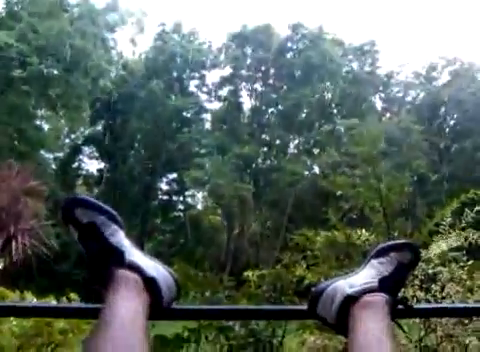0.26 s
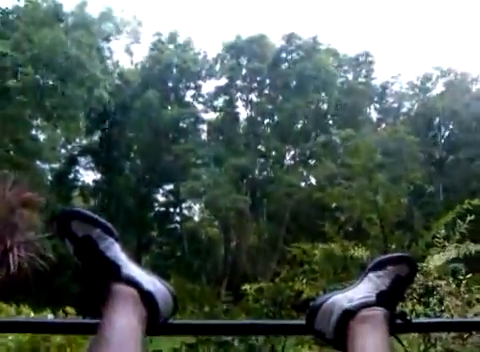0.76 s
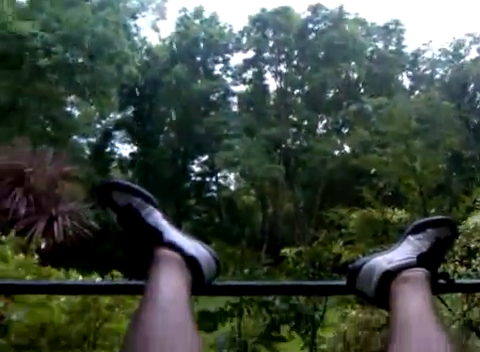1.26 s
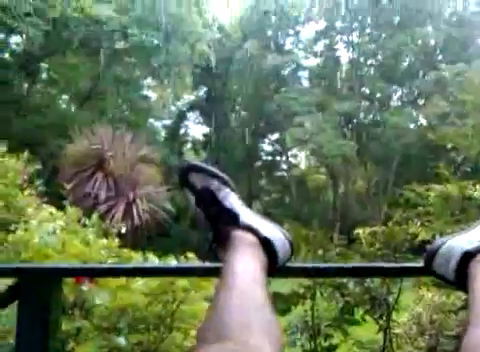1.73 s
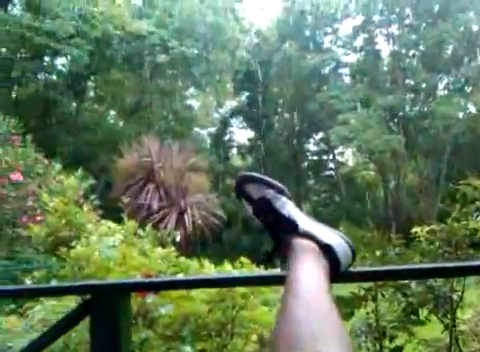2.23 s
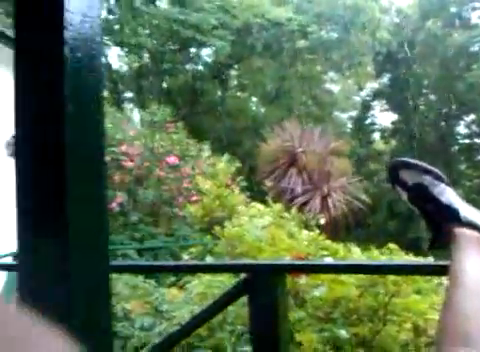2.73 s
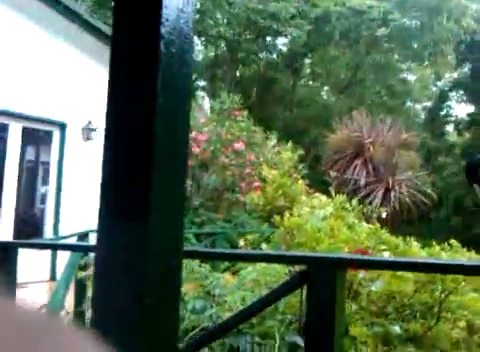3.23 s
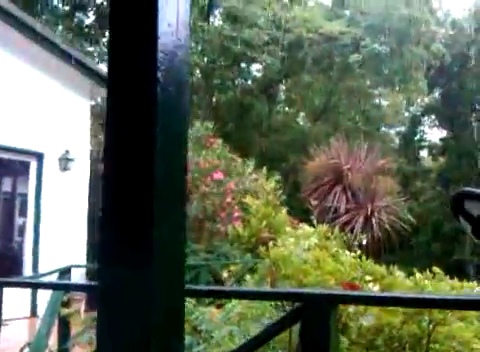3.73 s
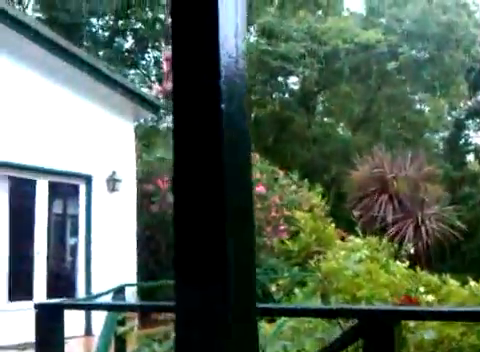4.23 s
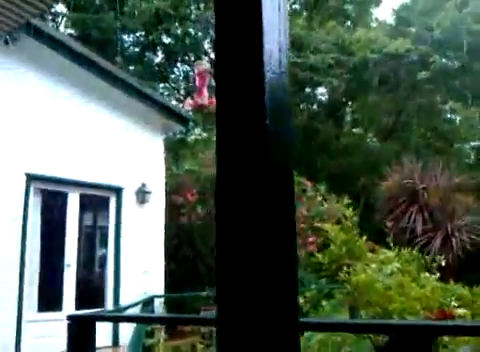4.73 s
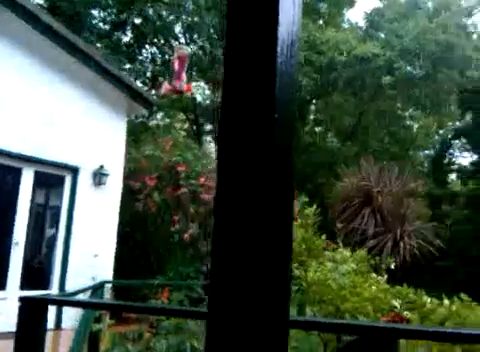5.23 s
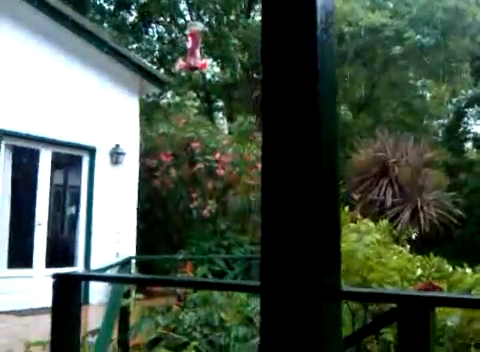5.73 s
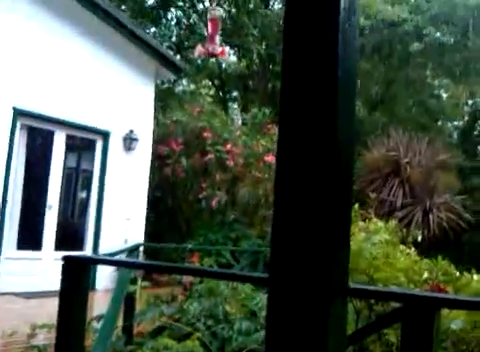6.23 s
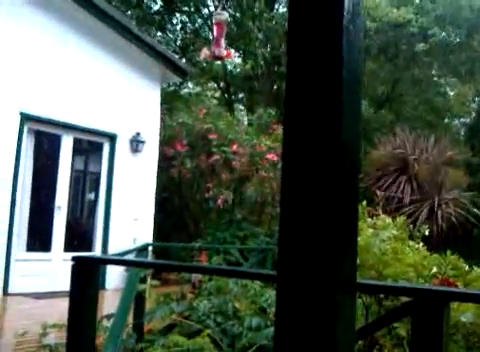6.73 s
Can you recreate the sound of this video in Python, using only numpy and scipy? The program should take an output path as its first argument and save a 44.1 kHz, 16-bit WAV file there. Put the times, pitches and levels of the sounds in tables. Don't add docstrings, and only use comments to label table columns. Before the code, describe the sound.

Steady rain falls on a leafy garden, heard from under a covered porch through a small handheld mono microphone. Distant drops blur into an even, soft wash over a low hum and faint rumble. Close up, crisp drops tick irregularly on leaves, rail and boards, with short scattered reflections. Nearby spatter is fuller in the first half, then thins, leaving isolated sharp taps.

```python
import sys
import numpy as np
from scipy import signal
from scipy.io import wavfile
from scipy.ndimage import uniform_filter1d

SR = 44100
rng = np.random.default_rng(int(sys.argv[2]) if len(sys.argv) > 2 else 0)


def boost(x):
    u = np.asarray(x, float) / 20
    return 10 ** u


def bounce(signal):
    frames = np.transpose(np.atleast_2d(signal))
    limited = np.clip(frames, -1, 1)
    pcm = np.round(limited * 32767).astype(np.int16)
    wavfile.write(sys.argv[1], SR, pcm)


N = 307818

# (time [s], strength [dB])
RAIN_STRENGTH = [(0.0, -46), (0.1, -54.5), (1.05, -50), (1.98, -45.5), (2.49, -44.5), (2.84, -46),
                 (3.24, -42.5), (3.81, -48), (4.0, -52), (4.31, -49.5), (4.72, -68), (5.38, -59),
                 (5.83, -66.5), (6.51, -49), (6.98, -58)]


def evened(x):
    return x / np.sqrt(np.mean(x ** 2) + 1e-20)


def read(points, hz):
    f, value = np.transpose(points)
    return np.interp(np.log(hz + 1), np.log(f + 1), value)


def curve(table, column):
    rows = np.array(table)
    return np.interp(np.arange(N) / SR, rows[:, 0], rows[:, column])


def add(mix, s, sound):
    part = mix[max(round(s * SR), 0):][:len(sound)]
    part += sound[:len(part)]


def low_pass(x, hz, size):
    return signal.oaconvolve(x, signal.firwin(size, hz, window=("kaiser", 11), fs=SR), "same")


def hiss(spectrum, size, patchy_db, flicker_db):
    frames, hz = 4 * N // size + 5, np.fft.rfftfreq(size, 1 / SR)
    real, imag, patches = rng.standard_normal((frames, len(hz), 3)).T
    patches = uniform_filter1d(patches, size=9, axis=0)
    patches = evened(uniform_filter1d(patches, size=9, axis=1))
    flicker = evened(uniform_filter1d(rng.standard_normal(frames), size=3))
    level_db = read(spectrum, hz)[:, None] + patchy_db * patches + flicker_db * flicker
    z = (real + 1j * imag) * boost(level_db)
    return evened(signal.istft(z, nperseg=size, noverlap=3 * size // 4)[1][:N])


def swell(top_hz):
    t = np.arange(0, N + 256, 256) / SR
    rates = np.geomspace(2.5, top_hz, num=20)
    wave = sum(np.sin(2 * np.pi * (f * t + rng.random())) / np.sqrt(f) for f in rates)
    return np.interp(np.arange(N) / SR, t, evened(wave))


def thumps():
    # (time [s], rise of the rumble [dB])
    nudges = [
        (.99, 7),
        (2.78, 6),
        (6.36, 4),
    ]
    width_s = .035
    t = np.arange(N) / SR
    return sum(db * np.exp(-((t - s) / width_s) ** 2) for s, db in nudges)


def rumble():
    # (frequency [Hz], density [dB per Hz])
    low_spectrum = [(7.1, -29.5), (12, -0.5), (110, -8.5), (140, -43), (240, -120)]
    level_db = -64 + thumps() + 0.7 * swell(top_hz=11.0)
    return boost(level_db) * hiss(low_spectrum, size=4096, patchy_db=2.5, flicker_db=1.3)


def porch_hum():
    # (frequency [Hz], width [Hz], level [dB])
    resonances = [
        (150, 45, 1),
        (246.7, 46, 2),
        (420, 93, -5.5),
        (660, 200, -2.5),
    ]
    hz = np.geomspace(60, 2000, num=300)
    power = sum(boost(2 * db) / (1 + (2 * (hz - f) / width) ** 2) ** 2 for f, width, db in resonances)
    spectrum = np.transpose([hz, 10 * np.log10(power)])
    level_db = -64.5 + 0.4 * swell(top_hz=11.)
    return boost(level_db) * hiss(spectrum, size=8192, patchy_db=-1.5, flicker_db=-2.5)


def far_wash(rain_db):
    # (frequency [Hz], density [dB per Hz])
    wash_spectrum = [(59, -37.5), (100, -2.5), (146, -2), (190, -2.5), (240, -2), (376, -1.5), (678, 1),
                     (769, 0), (1660, -1.5), (2020, -3), (6350, -8), (6820, -6), (7200, -14.5),
                     (9360, -43.5), (15800, -120)]
    usual_rain_db = -50
    level_db = -51.5 + 0.04 * (rain_db - usual_rain_db)
    return boost(level_db) * hiss(wash_spectrum, size=1024, patchy_db=0.66, flicker_db=0.93)


def leaf_spatter(rain_db):
    # (frequency [Hz], density [dB per Hz])
    spatter_spectrum = [
        (2000, -33.5),
        (3200, -5),
        (4500, -3.5),
        (6000, 0.5),
        (7300, -4),
    ]
    return boost(rain_db - 6) * hiss(spatter_spectrum, size=256, patchy_db=1., flicker_db=.7)


def ticks(hz, cycles, flutter):
    turns = (np.arange(128) / SR - .001) * hz
    width = np.maximum(cycles, .8) * np.where(turns < 0, .35, .7)
    tick = -np.cos(2 * np.pi * turns) * np.exp(-(turns / width) ** 2)
    tick = signal.fftconvolve(tick - tick.mean(1, keepdims=True), flutter, axes=1)
    return tick / abs(tick).max(1, keepdims=True)


def drops(rows, onset=0.0018, build=0.002, t60=0.16, grain=0.6, ringing=0.77,
          flutter_db=-20.0, flutter_s=0.00078):
    # (delay [s], level [dB])
    echoes = [
        (.0015, -7),
        (.0057, -9),
        (.0105, -12),
        (.0128, -11),
    ]
    tail_cycles = 1.46
    s, tick_db, tick_hz, cycles, tail_db, tail_hz = np.transpose(rows)[:, :, None]
    count = len(s)

    late = np.maximum(np.arange(4800) / SR - onset, 0)
    scatter, lumps = rng.standard_normal((count, len(late), 2)).transpose(2, 0, 1)
    scatter = scatter * np.exp(grain * lumps)
    scatter = scatter * (1 - np.exp(-late / build)) * boost(-60 * late / t60)

    flutter = boost(flutter_db) * rng.standard_normal((count, 128)) * np.exp(-np.arange(128) / SR / flutter_s)
    flutter[:, 0] = 1
    tail_ticks = ticks(tail_hz, ringing * np.maximum(cycles, tail_cycles), flutter)
    tail = signal.fftconvolve(scatter, tail_ticks, axes=1)
    tail *= boost(tail_db) / np.sqrt(np.mean(tail[:, 170:940] ** 2, axis=1, keepdims=True))

    paths, chance = np.zeros(scatter.shape), rng.uniform(-1, 1, (count, len(echoes), 2))
    paths[:, 0] = 1
    for k, (delay, db) in enumerate(echoes):
        at = np.round(delay * SR * (1 + .1 * chance[:, k, 0])).astype(int)
        paths[np.arange(count), at] = boost(db + 3 * chance[:, k, 1])
    direct = boost(tick_db) * signal.fftconvolve(paths, ticks(tick_hz, cycles, flutter), axes=1)

    out = np.zeros(N)
    for start, sound in zip(s[:, 0], direct + tail):
        add(out, start - .001, sound)
    return out


def patter(count, base_db=-54.0, size_db=-2.5, wet_db=-11.5, low_hz=3300, high_hz=7000):
    u = rng.random((count, 4))
    fallen = np.cumsum(boost(.2 * curve(RAIN_STRENGTH, column=1)))
    s = np.searchsorted(fallen / fallen[-1], u[:, 0]) / SR
    tick_db = base_db - size_db * np.log(np.maximum(u[:, 1], .05))
    hz = low_hz * (high_hz / low_hz) ** u[:, 2]
    cycles = 1.4 + 3.5 * u[:, 3]
    return drops(np.transpose([s, tick_db, hz, cycles, tick_db + wet_db, hz]))


def family(rows, cycles):
    s, tick_db, hz, tail_db = np.transpose(rows)
    tail_hz = hz + 0.11 * (5300 - hz)
    return drops(np.transpose([s, tick_db, hz, cycles + 0 * s, tail_db, tail_hz]))


def eave_drips():
    # (time [s], tick peak [dB], pitch [Hz])
    drips = [(.3004, -38, 6600), (0.264, -38, 4300), (.738, -41, 4300), (1.158, -40, 4100),
             (1.4455, -40, 3700), (1.5328, -41, 5600), (1.812, -38, 5900), (2.0756, -49, 5300),
             (2.1987, -44, 4970), (2.2668, -38, 5500), (2.5726, -36.5, 4550), (2.697, -45, 4400),
             (.5442, -40, 4500), (3.4767, -38, 5000), (3.2385, -31.5, 6300), (3.83, -37, 5450),
             (4.0022, -38.5, 5100), (4.19, -47, 5000), (4.2893, -48, 3750), (4.559, -38, 5560),
             (4.7207, -36, 5300), (4.838, -37.5, 5300), (5.1458, -37.5, 6200), (5.2165, -37, 4400),
             (5.2936, -37.5, 4900), (5.4574, -42, 4300), (5.617, -35.5, 5600), (5.886, -38.5, 4200),
             (5.9574, -43, 5850), (6.3322, -39.5, 3650)]
    tail_db = -20
    return family([(s, db, hz, db + tail_db) for s, db, hz in drips], cycles=1.8)


def leaf_splashes():
    # (time [s], tick peak [dB], pitch [Hz], scattered tail [dB rms])
    splashes = [(.0098, -31.5, 4730, -55), (.176, -50, 5700, -54), (.242, -37, 6600, -54),
                (3.238, -29, 4200, -51), (.5, -46, 5900, -49), (.925, -46, 6600, -48),
                (.7885, -37, 5000, -53), (1.3645, -39, 5400, -44), (1.0505, -33, 6100, -60),
                (1.2066, -35, 6500, -63), (1.3708, -32, 5540, -56), (1.5638, -32, 5200, -49),
                (1.7534, -33.5, 5470, -55), (1.8766, -43, 5400, -53), (2.1504, -44, 5760, -56),
                (2.1637, -33, 4800, -49), (2.3093, -34, 6000, -53), (2.4512, -42, 5000, -56),
                (2.5504, -33.5, 4750, -54), (2.6552, -49, 6140, -58), (2.7566, -39, 4470, -54),
                (3.017, -38, 5800, -51), (3.0457, -45, 5700, -54), (3.1481, -31, 6300, -47),
                (3.1685, -31, 6400, -65), (3.3329, -35.5, 5900, -55), (3.9812, -39, 5300, -53),
                (4.1714, -34, 6400, -51), (6.0875, -32, 5200, -55), (6.4333, -31, 4360, -50)]
    return family(splashes, cycles=2.8)


def hard_taps():
    # (time [s], tick peak [dB], pitch [Hz], scattered tail [dB rms])
    taps = [(.7322, -32, 5950, -49), (.8041, -25.5, 4680, -50), (1.1753, -31, 6300, -49),
            (1.3833, -36, 6000, -66), (1.4263, -31, 4800, -52.5), (1.9152, -32.5, 5500, -63),
            (2.1337, -31, 5400, -47.5), (2.3655, -28, 6100, -49), (2.6387, -29, 6300, -52),
            (2.6794, -32, 4800, -48.5), (2.9388, -43, 4800, -50), (2.9858, -38, 2880, -51),
            (.919, -28, 5500, -58), (3.378, -38, 3600, -51), (3.4105, -38, 4500, -54),
            (3.8139, -31, 5500, -58), (3.8498, -35, 5100, -53), (4.0455, -35, 5400, -46),
            (4.0554, -39, 6000, -48), (4.0969, -43, 5800, -46.5), (4.3237, -34, 5530, -59),
            (4.6669, -19.5, 4800, -41.5), (5.6022, -41, 4800, -60), (5.3358, -41, 5800, -52),
            (6.1241, -39, 5400, -55), (6.6317, -36, 4970, -49.5), (6.5212, -31.5, 5800, -59),
            (6.5972, -22.5, 5900, -48), (6.6483, -36, 5700, -58), (6.8998, -22.5, 5960, -49)]
    return family(taps, cycles=1.53)


def scene():
    rain_db = curve(RAIN_STRENGTH, column=1)
    background = rumble() + porch_hum() + far_wash(rain_db) + leaf_spatter(rain_db)
    near = patter(count=340) + eave_drips() + leaf_splashes() + hard_taps()
    near = signal.sosfilt(signal.butter(2, 2200, "high", fs=SR, output="sos"), near)
    mono = background + near
    return np.array([mono, mono])


def band_limit(x):
    return signal.sosfilt(signal.butter(12, 9250, fs=SR, output="sos"), x)


def record(dry):
    # (time [s], peak [dB])
    blip_times = [(0.1256, -75), (0.19, -74), (0.2532, -60), (0.8295, -62), (0.8939, -72), (0.9577, -70.5),
                  (1.151, -78), (1.213, -69), (1.4074, -61), (3.197, -70), (3.2615, -55.5), (4.0927, -67),
                  (4.1572, -70.5), (4.6706, -59), (4.7336, -68), (5.1816, -76), (6.0776, -75),
                  (6.1419, -72.5), (6.4626, -71), (6.5894, -70), (6.6524, -62), (6.9104, -52), (6.974, -74)]
    rate_hz = 16000
    t = np.arange(N) / SR
    blips, soft = np.zeros(N), np.zeros(N)
    for s, db in blip_times:
        add(blips, s - .0028, boost(db) * np.hanning(round(.012 * SR)))
        add(soft, s - .06, np.ones(round(.075 * SR)))
    soft = uniform_filter1d(np.minimum(soft, 1), size=400)
    steep_edge = low_pass(dry[0], 7270, size=4001)
    soft_edge = low_pass(dry[0], 7255, size=301)
    x = (1 - soft) * steep_edge + soft * soft_edge

    mirror = x * np.cos(2 * np.pi * rate_hz * t)
    mirror = boost(-17.5) * (low_pass(mirror, 8863, size=261) - low_pass(mirror, 8200, size=601))
    offset = .0007
    x = x + mirror + blips * np.cos(np.pi * rate_hz * t) + offset
    return band_limit(np.array([x, x]))


dry = scene()
out = record(dry)
bounce(out)
```